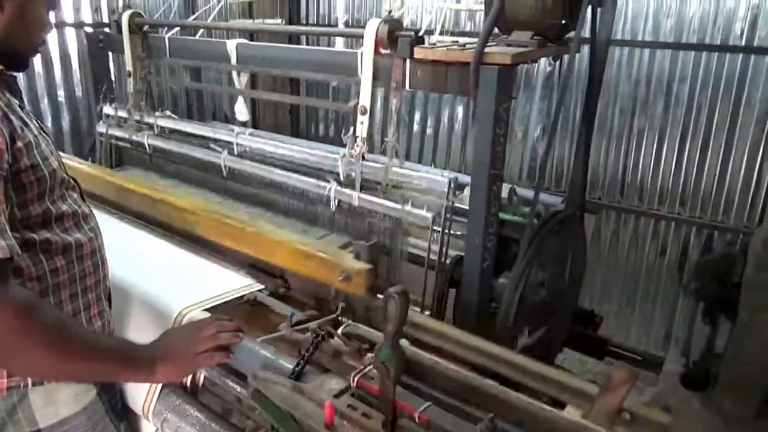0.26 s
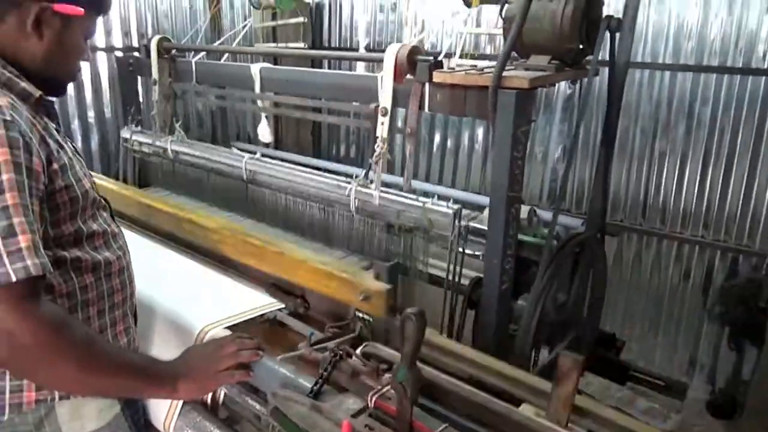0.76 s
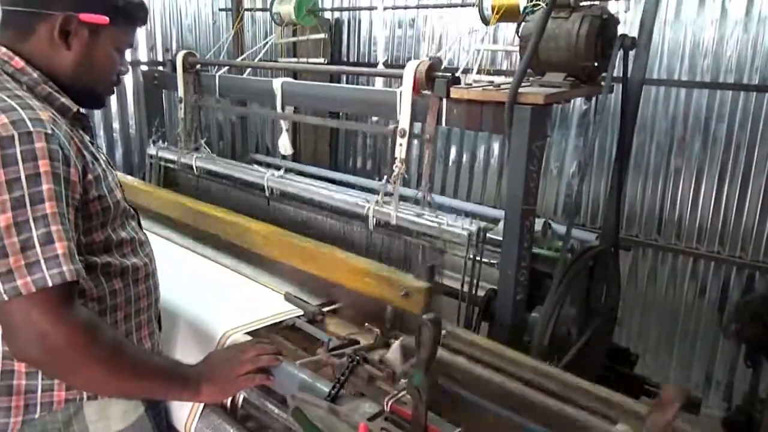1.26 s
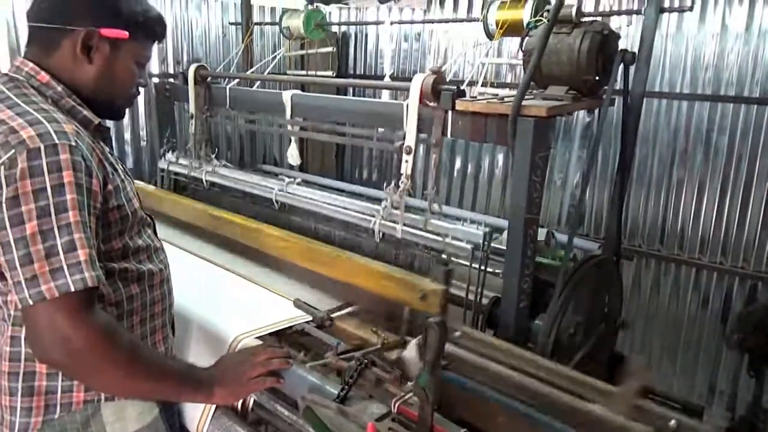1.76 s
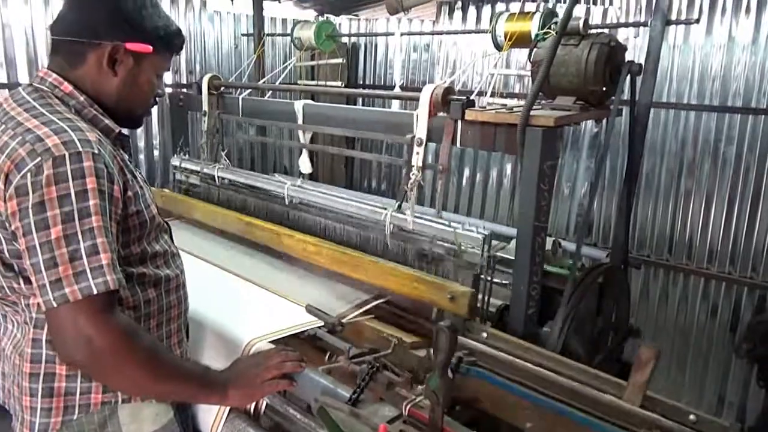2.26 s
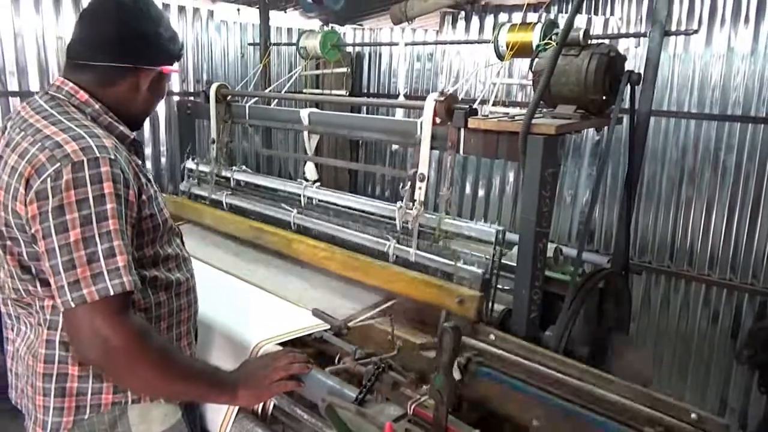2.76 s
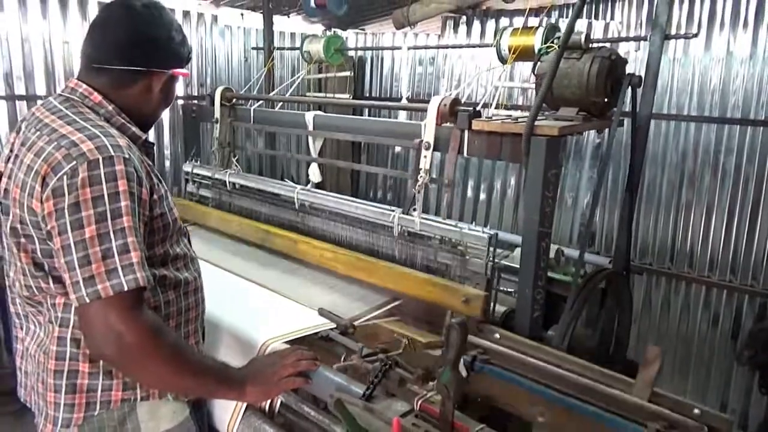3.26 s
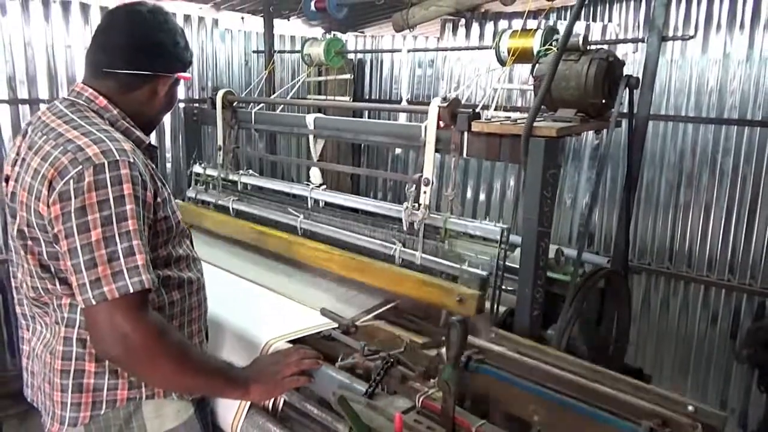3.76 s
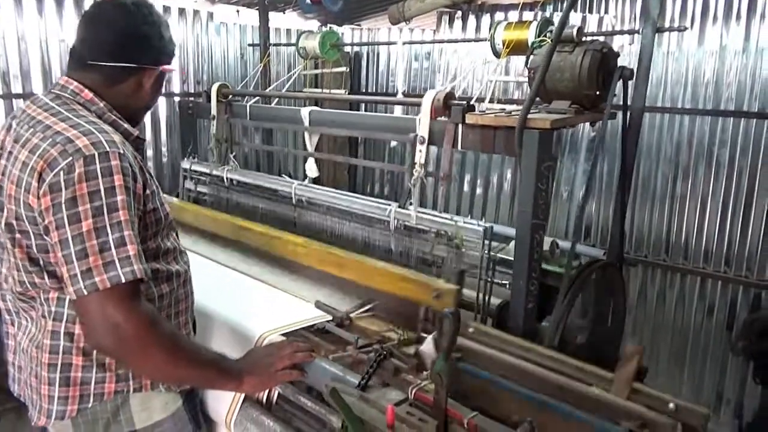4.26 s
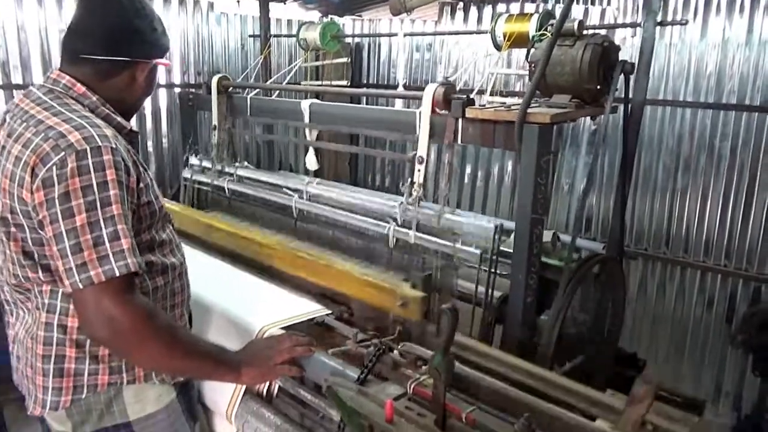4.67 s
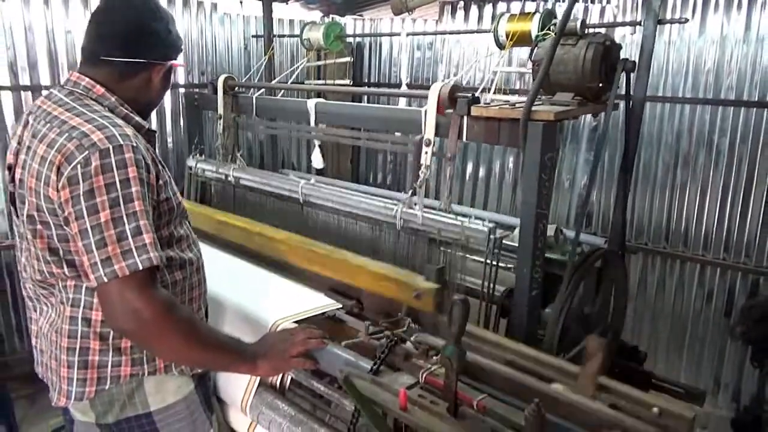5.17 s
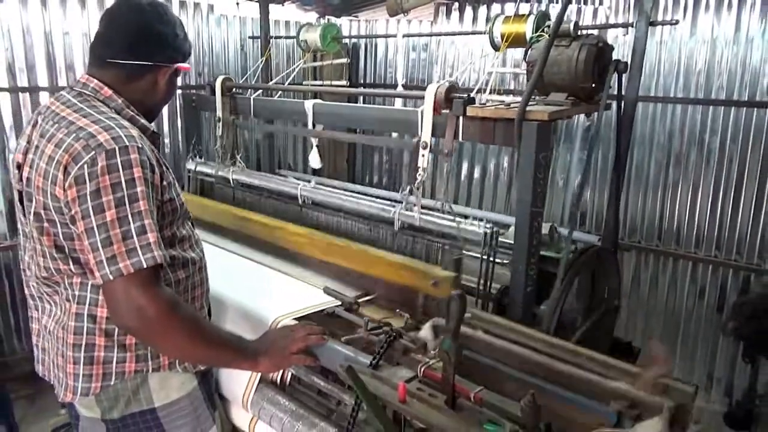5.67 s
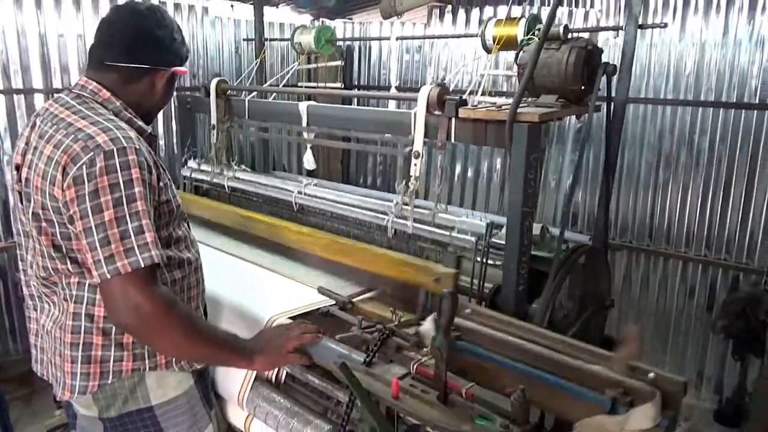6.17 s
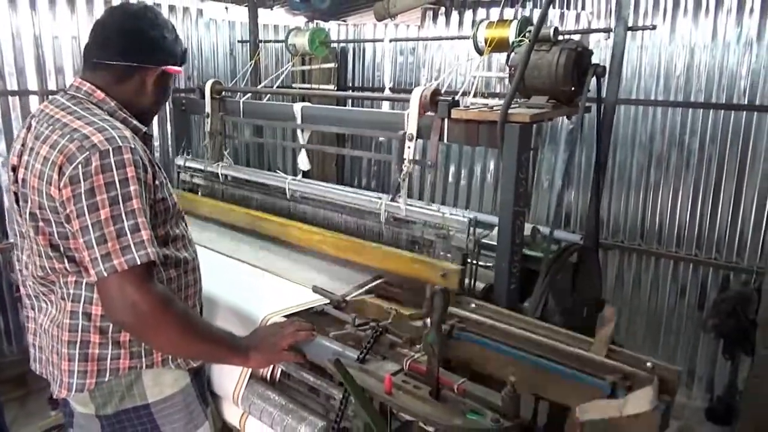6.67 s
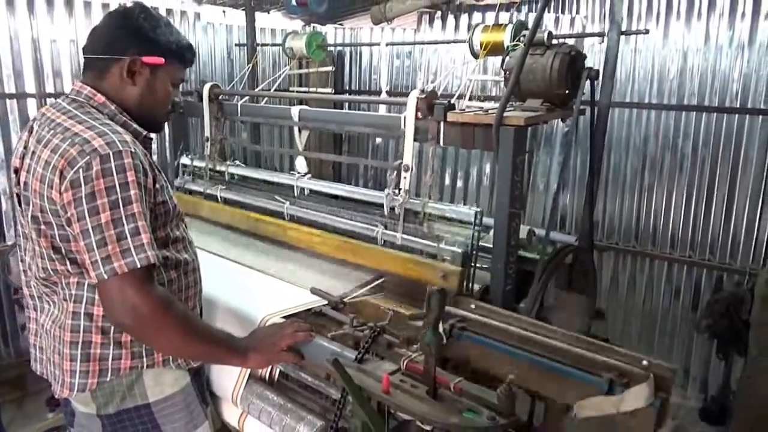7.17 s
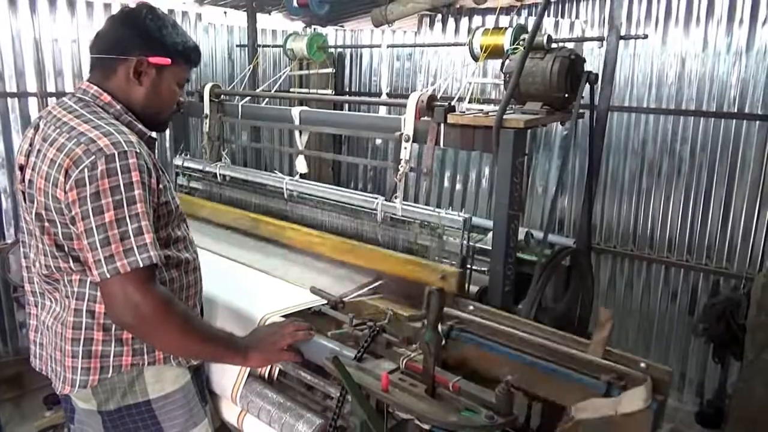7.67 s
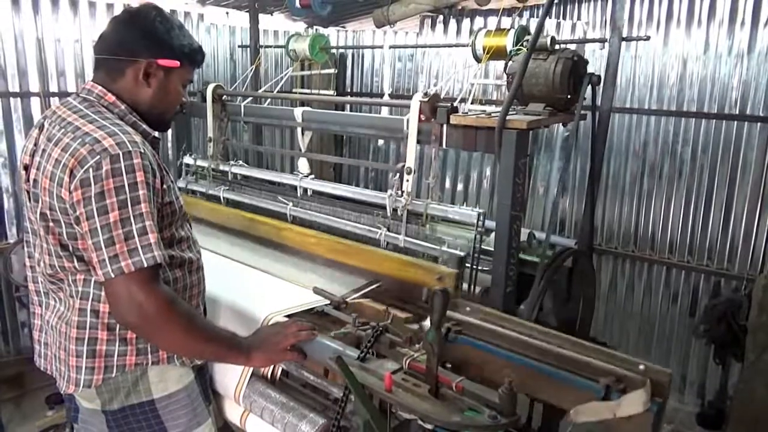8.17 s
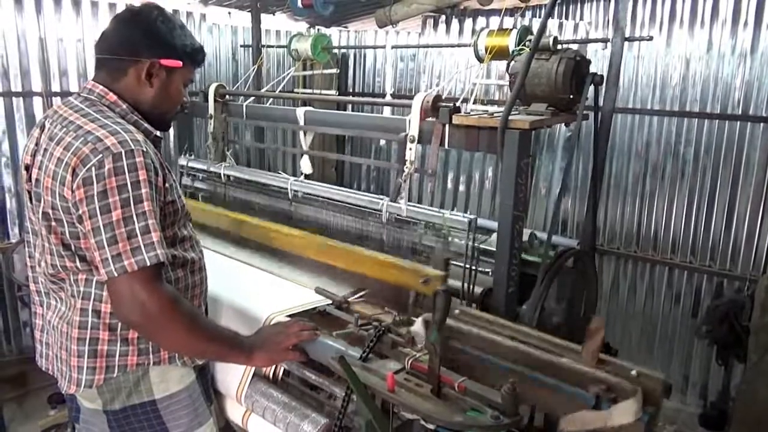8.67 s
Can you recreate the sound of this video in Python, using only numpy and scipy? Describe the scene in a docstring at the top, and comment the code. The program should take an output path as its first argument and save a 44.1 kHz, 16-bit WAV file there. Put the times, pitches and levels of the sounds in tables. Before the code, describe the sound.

A motor-driven shuttle loom is already running and never stops. Hard wood-and-steel clacks repeat in a quick, even cycle: the picker throws, the shuttle lands, the reed beats up. Loose rods and frame rattle between blows, and a motor and belts rush underneath. Close stereo microphone in a small, hard metal shed; loud, dense, slightly compressed sound.

```python
"""A shuttle loom runs in a sheet-metal shed, two picks every 1.1 s. The picker throws the shuttle, the shuttle lands,
a latch snaps, the take-up knocks and the reed beats up: each blow is decaying noise with wood and steel modes.
Between the blows heddles and frame rattle as random damped knocks; brief pitched spots colour the clatter.
The shed prolongs every blow; motor and belts drone as filtered noise.
A compressor flattens the loud blows and ducks the drone."""
import sys
import numpy as np
from scipy import signal
from scipy.fft import rfft, irfft, next_fast_len
from scipy.io import wavfile
from scipy.ndimage import uniform_filter1d, minimum_filter1d

SR = 44100
rng = np.random.default_rng(int(sys.argv[2]) if len(sys.argv) > 2 else 0)


def put_to_file(sound):
    """Save the sound as 16-bit audio at rate SR, in the file named by the first command-line argument."""
    columns = np.atleast_2d(sound).T  # one column per channel
    safe = np.clip(columns, -1, 1)
    whole_steps = np.round(safe * 32767)
    wavfile.write(sys.argv[1], SR, whole_steps.astype(np.int16))


N = 392490
CYCLE_S = 1.1037  # two picks
FRAME = 256  # samples in a short-time spectrum of the shed

# Steady noise spectrum of motor, belts and gears: [hz, level_db per Hz]
DRONE_SPECTRUM = [(15, -62), (25, -44), (82, -19), (204, -7), (432, -5.5), (597, -0.5), (1170, 2.5),
                  (2230, 2), (5560, -16), (8780, -9), (13100, -18), (14200, -18), (15400, -80)]
# Narrow noise bands of motor and frame hum: [centre_hz, width_hz, level_db]
HUM_BANDS = [(45, 15, -71.5), (96.5, 33, -55), (160, 25, -55), (330, 87, -49)]
# Slow wavering of the hum: [time_s, gain_db]
HUM_SWELL_CURVE = [(0, 0), (2, 1.5), (4, 0), (5.5, 0), (7, 2.5), (7.8, 1.5), (8.9, 3)]
# Reverberation time of the shed: [hz, t60_s]
SHED_DECAY = [(200, 0.66), (800, 0.51), (2000, 0.39), (5500, 0.47), (12000, 0.33)]
# Likeness of the two ports: [hz, left-right correlation]
PORT_LIKENESS = [(60, 0.98), (250, 1), (500, 0.94), (1000, 0.77), (2400, 0.75), (6000, 0.75), (9000, 0.9),
                 (11500, 1), (15000, .995)]
# Phase by which the left port leads: [hz, lead_rad]
PORT_LEAD = [(0, 0), (1120, 0.072), (5940, 0.16), (15200, -0.0)]
# Level difference of the ports: [hz, left_minus_right_db]
PORT_TILT = [(60, 0), (240, 1.5), (950, 0.0), (3770, -0.5), (15000, -0.5)]
# Shaking of the frame over one cycle of two picks: [time_in_cycle_s, level_db]
SHAKE_CURVE = [(0, -16), (.1, -59), (.14, -25.5), (.2, -12.5), (.27, -25.5), (.33, -68), (.42, -38),
               (.48, -31), (.55, -18), (.63, -36), (.68, -22), (.76, -16), (.83, -22), (.9, -67),
               (.98, -31.5), (1.04, -21), (1.09, -20.5)]
# Jolts that set off a rattle, four a cycle: [start_s, extra_shake_db, loosest_part_hz, loosest_part_db]
JOLT_EVENTS = [(0, -1, 2780, -1), (0.1, -8, 2130, -5), (0.33, -1.5, 840, -4), (0.63, -3, 1380, -5),
               (0.9, -5, 2410, -12), (1.2, -3.5, 1180, -2.5), (1.43, -3, 5200, -11), (1.73, 0, 1200, -7),
               (2, -5, 5080, -13), (2.31, -7, 1300, 0), (2.54, -7, 5250, -14), (2.84, -2, 2370, -9),
               (3.11, -3.5, 2400, -4), (3.41, -4.5, 5250, -17), (3.64, -3, 860, -10), (3.94, 0, 3450, -3),
               (4.21, -6, 4370, -7), (4.51, -3, 1200, -5), (4.74, -12, 870, 3), (5.04, -2, 1470, -13),
               (5.31, -7, 2580, -2), (5.62, -4, 1200, -1.5), (5.85, -8, 2210, 1), (6.15, -3.5, 3270, -4),
               (6.42, -3.5, 4600, -10), (6.72, 0, 1820, -11), (6.95, -6, 860, -13), (7.25, -1, 3240, -4),
               (7.52, -5, 4600, -8), (7.83, -2, 1390, -1), (8.06, -1.5, 2160, -4), (8.36, -4.5, 1190, -2),
               (8.63, -1, 4480, -8)]
# Spectrum of ticks too dense to tell apart: [hz, level_db per Hz]
TICK_SPECTRUM = [(200, -49), (500, -6.5), (1000, -5), (1400, -0.5), (3200, -2), (6000, -8), (9400, -10),
                 (13000, -31.5), (15500, -50)]
# Brief pitched spots in the clatter: [start_s, pitch_hz, level_db]
PITCHED_SPOTS = [(0.17, 2110, -18), (0.732, 3280, -20), (0.86, 1144, -22), (0.744, 1374, -21),
                 (0.788, 1320, -18), (1.271, 2110, -16), (1.768, 2600, -18), (1.774, 3540, -21),
                 (2.961, 2300, -21), (3.468, 1790, -15), (4.023, 2230, -14), (4.041, 1217, -16),
                 (4.099, 1100, -19), (5.098, 1456, -22), (5.224, 1380, -21), (5.701, 2160, -17),
                 (6.272, 3160, -17), (7.383, 3140, -21), (7.842, 1150, -18), (7.934, 1544, -15),
                 (8.25, 2156, -19), (8.425, 2530, -22), (8.497, 1330, -16)]
# Modes of bunched thin steel rods: [hz, level_db, t60_s]
STEEL_MODES = [(7720, -8, 0.012), (9240, -9, 0.026)]
# Modes of the wooden sley and stick: [hz, level_db, t60_s]
WOOD_MODES = [(638, -6.5, 0.048), (762, -5.5, 0.052), (1200, -0.5, 0.048)]
# Snaps of the latch: [start_s, level_db]
LATCH_BLOWS = [(0.4171, -24), (1.5176, -23), (2.624, -22.5), (3.7255, -24), (4.834, -21.5), (5.9335, -23.5),
               (7.038, -22), (8.1405, -22.5)]
# Spectrum of the struck latch: [hz, level_db per Hz]
LATCH_SPECTRUM = [(200, -32), (700, -11), (1500, 4), (3500, -7.5), (6000, -2.5), (9100, -1), (12500, -16),
                  (15500, -36)]
# Dull knocks of the cloth take-up before the near beat-up: [start_s, level_db]
TAKE_UP_BLOWS = [(0.478, -18.5), (1.5867, -22.5), (2.6889, -20.5), (3.7934, -22.5), (4.898, -20.5),
                 (5.9984, -18.5), (7.1029, -20), (8.2056, -19)]
# Landings of the shuttle: [start_s, level_db]
LANDING_BLOWS = [(0.3263, -16.5), (0.874, -14.5), (1.4288, -15.5), (1.9805, -14.5), (2.5341, -17),
                 (3.084, -15.5), (3.6406, -18), (4.1886, -15), (4.7442, -16.5), (5.292, -12), (5.8456, -17),
                 (6.3944, -14.5), (6.9492, -17), (7.497, -15), (8.0517, -16), (8.5995, -15)]
# Spectrum of the shuttle landing: [hz, level_db per Hz]
LANDING_SPECTRUM = [(200, -4.5), (700, 6.5), (1300, 5.5), (2600, 3.5), (4500, -3.5), (9100, -0.5),
                    (12500, -15), (15500, -37)]
# Beat-ups of the reed: [start_s, level_db, raised_band_hz]
REED_BLOWS = [(-0.05, -10, 2780), (0.5118, -14.5, 700), (1.0386, -25, 2800), (1.0536, -17.5, 2840),
              (1.6153, -14.5, 2840), (2.1581, -16, 2940), (2.7218, -16, 5240), (3.2596, -17.5, 2400),
              (3.8243, -14.5, 790), (4.3691, -18, 4500), (4.9298, -14, 3860), (5.4706, -18, 5560),
              (6.0315, -16, 2180), (6.5731, -16.5, 4400), (7.1357, -15.5, 3790), (7.6706, -18, 4610),
              (8.2373, -11.5, 2170), (8.7152, -23.5, 4570), (8.7761, -17.5, 4330)]
# Spectrum of the struck reed, shared by the take-up: [hz, level_db per Hz]
REED_SPECTRUM = [(200, -22), (700, -2.5), (1500, -0.5), (3500, -3.5), (6000, -8.5), (9100, -9.5),
                 (12500, -26.5), (15500, -46)]
# Throws and rebounds of the picker: [start_s, level_db, raised_band_hz]
PICKER_BLOWS = [(0.1147, -22, 1990), (0.1437, -14, 2030), (0.6605, -16.5, 4870), (0.7463, -18, 1340),
                (1.2182, -28, 1760), (1.2432, -15.5, 1810), (1.2591, -20, 2010), (1.765, -19.5, 2580),
                (1.8189, -19, 3800), (2.3217, -18.5, 1230), (2.3537, -15, 1340), (2.8675, -16.5, 1980),
                (2.9323, -27, 2330), (3.4492, -18.5, 1840), (3.4651, -13, 1830), (3.978, -20, 815),
                (4.0259, -13.5, 3460), (4.5317, -17, 1820), (4.5656, -14, 1240), (4.5836, -15, 1320),
                (5.0735, -15, 1470), (5.1303, -19, 1390), (5.6631, -19, 2160), (5.6801, -16.5, 2180),
                (6.176, -18.5, 3130), (6.7377, -18.5, 955), (6.7866, -15, 1830), (7.2805, -17, 2670),
                (7.3463, -28, 3180), (7.8362, -20, 1410), (7.8671, -15, 1460), (8.383, -16, 2900)]
# Spectrum of the struck picker: [hz, level_db per Hz]
PICKER_SPECTRUM = [(200, -42.5), (450, -10.5), (1300, 3.5), (3200, 0.5), (6000, -8.5), (9300, -8),
                   (12500, -24), (15500, -71)]


def amp(db):
    """Amplitude ratio: twenty decibels are a factor of ten."""
    return 10 ** (np.asarray(db) / 20)


def unit(x):
    """Normalization: the signal is scaled to rms 1."""
    return x / np.sqrt(np.mean(x ** 2) + 1e-20)


def along(points, hz):
    """Logarithmic interpolation: (hz, value) points are joined on a log frequency axis."""
    point_hz, value = np.transpose(points)
    return np.interp(np.log(hz + 1), np.log(point_hz + 1), value)


def filtered(x, response):
    """Linear filtering: the spectrum of x is multiplied by a frequency response."""
    m = next_fast_len(N + SR // 2)
    return irfft(rfft(x, m) * response(np.fft.rfftfreq(m, 1 / SR)), m)[..., :N]


def drone(level_db=-31.5):
    """Stationary random noise: motor, belts and gears rush steadily over narrow bands of wavering hum."""
    def shaped_noise(response):
        return unit(filtered(rng.standard_normal((2, N)), response))

    rush = amp(level_db) * shaped_noise(lambda hz: amp(along(DRONE_SPECTRUM, hz)))
    swell = amp(np.interp(np.arange(N) / SR, *np.transpose(HUM_SWELL_CURVE)))
    hum = 0
    for centre_hz, width_hz, band_db in HUM_BANDS:
        hum = hum + amp(band_db) * shaped_noise(lambda hz: np.exp(-((hz - centre_hz) / width_hz) ** 2))
    return rush + swell * hum


def shed(x):
    """Diffuse reverberation: the energy at each frequency decays exponentially and returns with random phase."""
    hz, t, z = signal.stft(x, SR, nperseg=FRAME)
    keep = amp(-2 * 60 * t[1] / along(SHED_DECAY, hz))  # power kept from one frame to the next
    power = np.mean(abs(z) ** 2, axis=0)
    held = np.array([signal.lfilter([0, 1 - k], [1, -k], p) for k, p in zip(keep, power)])
    noise = signal.stft(rng.standard_normal(x.shape), SR, nperseg=FRAME)[2]
    noise = noise / np.sqrt(np.mean(abs(noise) ** 2))
    return signal.istft(noise * np.sqrt(held), SR, nperseg=FRAME)[1][:, :N]


def dying(colour_db):
    """Frequency-dependent decay: pairs of noise tails, coloured to rms 1 at the start, die at the shed's t60."""
    gain = amp(colour_db(np.fft.rfftfreq(2 * FRAME, 1 / SR)))
    gain = gain / np.sqrt(np.mean(gain ** 2, axis=-1, keepdims=True))
    hz, t, z = signal.stft(rng.standard_normal((len(gain), 2, SR // 3)), SR, nperseg=2 * FRAME)
    fade = amp(-60 * t / along(SHED_DECAY, hz)[:, None])
    return signal.istft(z * gain[:, None, :, None] * fade, SR, nperseg=2 * FRAME)[1]


def ports(pair):
    """Partial coherence: shared and unshared sound fields reach two close microphone ports."""
    turn = lambda hz: np.arccos(np.clip(along(PORT_LIKENESS, hz), -1, 1)) / 2
    mid, side = filtered(pair, lambda hz: np.array([np.cos(turn(hz)), np.sin(turn(hz))]))
    # each port takes half of the level and phase difference
    half = lambda hz: amp(along(PORT_TILT, hz) / 2) * np.exp(.5j * along(PORT_LEAD, hz))
    return filtered(np.array([mid + side, mid - side]), lambda hz: np.array([half(hz), 1 / half(hz)]))


def rattle(per_s=700, spread_db=5, octaves=0.7, cycles=12, ticks_db=-3, wet_db=2.5, detune=0.028,
           typical_hz=2300, rise_oct_per_db=0.0941):
    """Random impacts: loose wires, shafts and slats knock, louder and higher the harder the frame shakes."""
    draw = rng.standard_normal((int(per_s * N / SR), 3))
    s = np.sort(rng.random(len(draw))) * N / SR
    phase_s, db = np.transpose(SHAKE_CURVE)
    start_s, extra_db, loose_hz, loose_db = np.transpose(JOLT_EVENTS)
    jolt = np.searchsorted(start_s[1:], s)
    loose = np.arange(len(s)) % 3 == 0  # every third knock is the loosest part

    shake_db = np.interp(s, phase_s, db, period=CYCLE_S)
    size = amp(shake_db + extra_db[jolt] + loose * loose_db[jolt] + spread_db * draw[:, 0])
    octave = rise_oct_per_db * (shake_db - db.max()) + octaves * draw[:, 1]
    hz = np.where(loose, loose_hz[jolt] * (1 + detune * draw[:, 1]), typical_hz * 2 ** octave)
    hz = np.clip(hz, 550, SR / 4)[:, None]

    t = np.arange(FRAME * 3 // 2) / SR
    swell = (1 - np.exp(-hz * t)) * np.cos(np.pi / 2 * t / t[-1])
    damping = hz / cycles * np.e  # per second
    knock = swell * np.sin(2 * np.pi * hz * t) * np.exp(-damping * t) * np.sqrt(damping / per_s * 8)
    field = draw[:, 2:] > 0  # each knock falls in one of the two sound fields
    where = (s * SR).astype(int)[:, None] + np.arange(len(t)) + field * (N + len(t))
    knocks = np.bincount(where.ravel(), (size[:, None] * knock).ravel(), 2 * (N + len(t)))
    knocks = knocks.reshape(2, -1)[:, :N]

    shake = amp(np.interp(np.arange(N) / SR, phase_s, db, period=CYCLE_S) + ticks_db)
    ticks = unit(filtered(rng.standard_normal((2, N)), lambda hz: amp(along(TICK_SPECTRUM, hz))))
    dry = knocks + shake * ticks
    return dry + amp(wet_db) * shed(dry)


def pitched_spots(rise_s=0.0025, t60=0.17, detune=0.0119):
    """Beating of close tones: each brief pitched spot is a cluster of three sines that swells quickly and dies."""
    s, hz, db = np.transpose(PITCHED_SPOTS)[..., None, None]
    t = np.arange(SR // 8) / SR
    draw = rng.standard_normal((len(s), 3, 2))
    tones = np.sin(2 * np.pi * hz * (1 + detune * draw[..., :1]) * t + 2 * draw[..., 1:]).sum(1)
    shaped = amp(db[:, 0] - 60 * t / t60) * (1 - np.exp(-t / rise_s)) * tones
    where = (s[:, 0] * SR).astype(int) + np.arange(len(t))
    spots = np.bincount(where.ravel(), shaped.ravel(), N + len(t))[:N]
    return spots * np.array([[1], [.7]])  # stronger in the shared field


def struck(modes, count, size, detune):
    """Modal superposition: a blow excites a short burst of damped modes, slightly different each time."""
    t = np.arange(SR // 12) / SR
    hz, db, t60 = np.repeat(modes, size, axis=0).T[..., None]
    draw = rng.standard_normal((count, len(hz), 3, 1))
    wave = np.sin(2 * np.pi * hz * (1 + detune * draw[:, :, 1]) * t + 2 * draw[:, :, 2])
    return np.sum(amp(db + 2 * draw[:, :, 0] - 60 * t / t60) * wave, 1)


def blows(table, tone, jingle_db, knock_db, bright_db, harder, far_db, band_db, band_hz=None, band_width=0.19,
          chatter_db=1.14, crack_db=-7, crack_s=0.0027):
    """Impact excitation: a wooden knock, jingling rods and a shed tail whose brightness grows with strength."""
    s, db, *own_band_hz = np.transpose(table)[..., None]
    octave = lambda hz, centre: np.log2((hz + 50) / centre)
    far_pick = (s - .1) % CYCLE_S > CYCLE_S / 2  # second half of the cycle
    bright = bright_db + harder * (db - db.mean()) + far_db * far_pick  # dB per octave
    band = lambda hz: band_db * np.exp(-(octave(hz, band_hz or own_band_hz[0]) / band_width) ** 2)
    tails = dying(lambda hz: along(tone, hz) + bright * octave(hz, 2500) + band(hz))

    t = np.arange(tails.shape[-1]) / SR
    rods = amp(jingle_db) * struck(STEEL_MODES, count=len(s), size=5, detune=0.0605)
    knock = amp(knock_db) * struck(WOOD_MODES, count=len(s), size=1, detune=0.047)
    tails[:, 0, :rods.shape[1]] += rods + knock

    chatter = unit(uniform_filter1d(rng.standard_normal((len(s), 1, len(t))), size=160))  # parts bounce unevenly
    tails = tails * amp(chatter_db * chatter) * np.cos(np.pi / 2 * t / t[-1])
    tails = tails * (1 + amp(crack_db) * np.exp(-t / crack_s))  # the direct crack stands above the tail
    tails = tails * (1 - np.exp(-(t / .0003) ** 2))  # soft onset

    out = np.zeros((2, N + 2 * SR))  # a spare second at each end
    for start, blow in zip(s[:, 0], amp(db)[..., None] * tails):
        out[:, round((start + 1) * SR):][:, :len(t)] += blow
    return out[:, SR:SR + N]


def latch_and_pawl(pawl_s=.958, pawl_db=-27.5):
    """Light impact: the latch snaps, and a pawl clicks at one fixed point of every cycle."""
    clicks = LATCH_BLOWS + [(s, pawl_db) for s in np.arange(pawl_s, N / SR, CYCLE_S)]
    return blows(clicks, LATCH_SPECTRUM, jingle_db=0.0, knock_db=-11, bright_db=-0.4, harder=0.06,
                 far_db=-0.9, band_db=2.5, band_hz=4960)


def take_up(lead_s=.033, lead_db=-5.5):
    """Double contact: each dull knock of the cloth take-up follows a softer first contact."""
    contacts = TAKE_UP_BLOWS + [(s - lead_s, db + lead_db) for s, db in TAKE_UP_BLOWS]
    return blows(contacts, REED_SPECTRUM, jingle_db=-6, knock_db=-2, bright_db=-2.1, harder=0.41,
                 far_db=0, band_db=0, band_hz=840)


def landing():
    """Arrested motion: the landing shuttle gives a broad blow with a dip around 607 Hz."""
    return blows(LANDING_BLOWS, LANDING_SPECTRUM, jingle_db=-6, knock_db=-9.5, bright_db=.9, harder=0.08,
                 far_db=0.16, band_db=-2, band_hz=607)


def reed():
    """Broadband impact: each beat-up is a noise blow with a raised band that varies from blow to blow."""
    return blows(REED_BLOWS, REED_SPECTRUM, jingle_db=-8.0, knock_db=-19, bright_db=1.4, harder=0.077,
                 far_db=0.7, band_db=4)


def picker():
    """Impulsive throw: throws and rebounds excite wood, rods and noise with a raised band that varies from blow
    to blow."""
    return blows(PICKER_BLOWS, PICKER_SPECTRUM, jingle_db=-2, knock_db=-3.5, bright_db=0.6, harder=0.2,
                 far_db=-0.2, band_db=3.5)


def scene():
    """Superposition: all parts of the loom add in the shed; small parts radiate little bass."""
    hits = latch_and_pawl() + take_up() + landing() + reed() + picker()
    small = filtered(hits + pitched_spots() + rattle(), lambda hz: (1j * hz / (250 + 1j * hz)) ** 3)
    return ports(small + drone())


def record(dry, low_hz=25, knee_db=-18, attack_s=0.00041, release_s=0.035, squeeze=.85, peak=.62, top_hz=15590):
    """Dynamic compression: after a bass loss, gain falls with short-term power; a limiter and band limit follow."""
    x = filtered(dry, lambda hz: 1j * hz / (low_hz + 1j * hz))
    power = np.mean(x ** 2, axis=0)
    smoothed = lambda s: signal.lfilter([1 / (s * SR)], [1, 1 / (s * SR) - 1], power)
    loud = np.maximum(smoothed(attack_s) / 2, smoothed(release_s))  # quick to clamp, slower to let go
    x = x * (1 + (loud / amp(2 * knee_db)) ** 4) ** (-squeeze / 8)
    needed = np.minimum(1, peak / (np.max(abs(x), axis=0) + 1e-9))
    x = x * uniform_filter1d(minimum_filter1d(needed, size=45), size=44)  # limiter gain, smoothed over 1 ms
    return filtered(x, lambda hz: hz < top_hz)


dry = scene()
out = record(dry)
put_to_file(out)
```